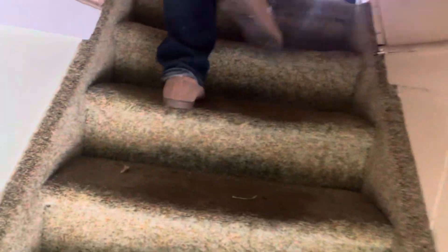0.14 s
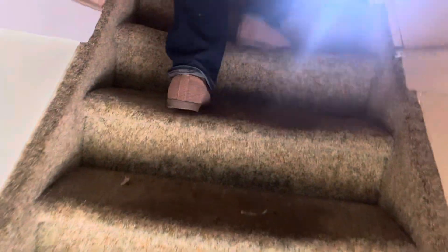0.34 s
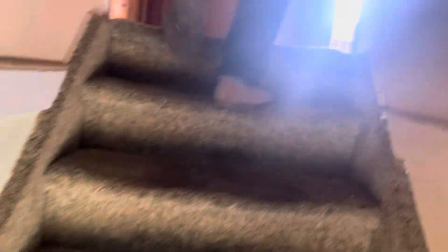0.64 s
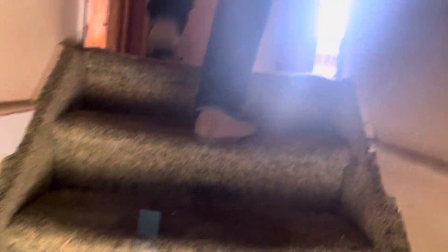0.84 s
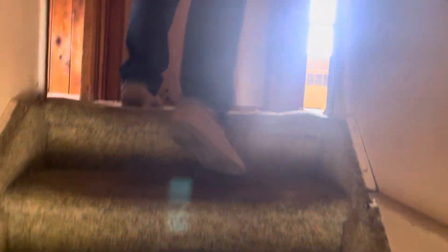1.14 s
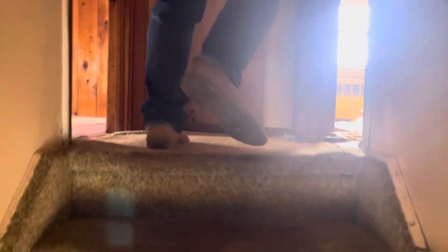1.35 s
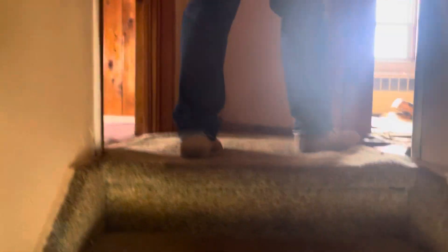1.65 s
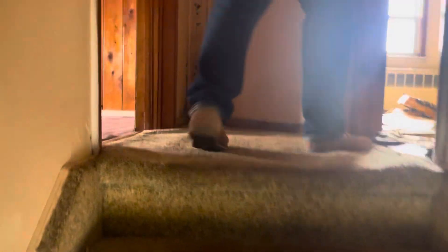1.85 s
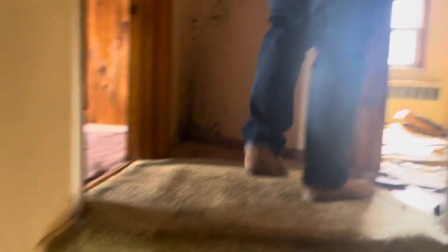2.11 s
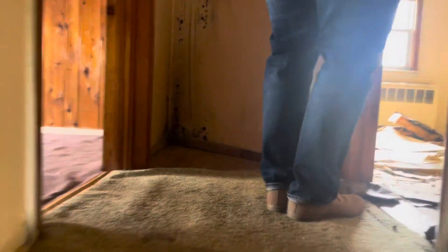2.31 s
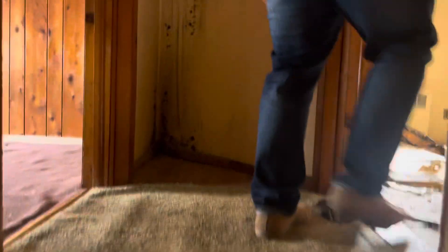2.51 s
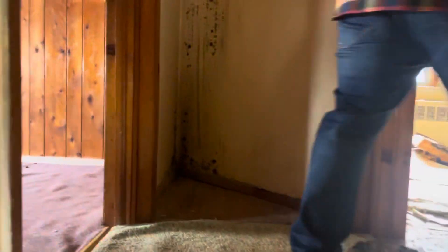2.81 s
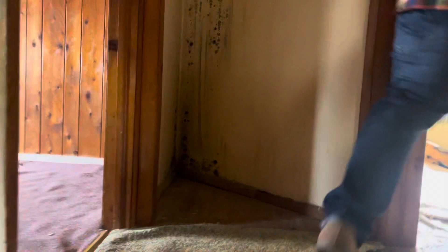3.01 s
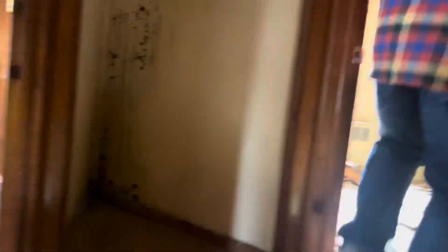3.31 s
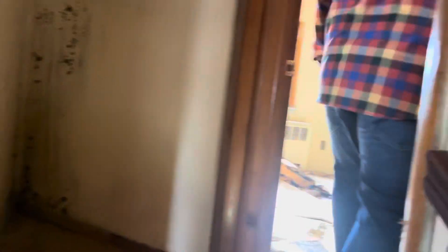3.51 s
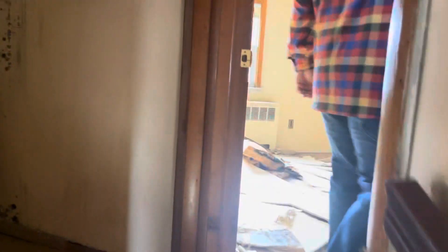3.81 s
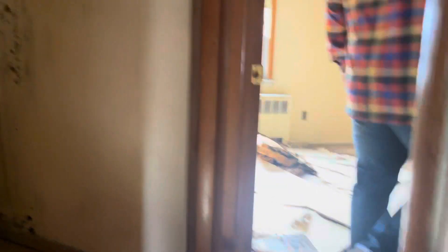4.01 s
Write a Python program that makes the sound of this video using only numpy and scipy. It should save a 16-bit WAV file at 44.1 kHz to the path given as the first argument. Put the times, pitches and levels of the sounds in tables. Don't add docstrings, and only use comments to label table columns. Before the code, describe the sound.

Close hand-held stereo capture in an empty stairwell: a soft first step, firmer regular thumps on carpet over wood, a heavy booming one near 2.4 seconds, then a softer step and a last firm one. Feet brush pile, trouser legs swish, fingers tap the casing, with a brief creaking crack around 1.9 seconds. Faint quiet-house air underneath, short indoor reverberation.

```python
import sys
import numpy as np
from scipy import signal
from scipy.fft import rfft, irfft, next_fast_len
from scipy.io import wavfile
from scipy.ndimage import uniform_filter1d, map_coordinates

SR = 44100
rng = np.random.default_rng(int(sys.argv[2]) if len(sys.argv) > 2 else 0)


def store_pcm(level_fs):
    pcm = np.round(np.clip(level_fs, -1, 1) * 32767).astype(np.int16)
    wavfile.write(sys.argv[1], SR, np.atleast_2d(pcm).T)


def gain_from_db(level_db):
    decades = np.asarray(level_db, float) / 20
    return 10 ** decades


N = 183191

# t/s, tread level/dB, riser level/dB, board level/dB, foot rolls down after/s
FOOTFALLS = [
    (0.223, -23, -26, -56, .003),
    (1.005, -14, -30, -25, .025),
    (1.704, -16, -27, -24, .017),
    (2.379, -8.5, -30, -13.5, .03),
    (2.96, -20, -28, -25, .01),
    (3.646, -15.5, -15, -31, .016),
]


def unit(x):
    return x / np.sqrt(np.mean(x ** 2) + 1e-20)


def along(points, hz):
    f, v = np.transpose(points)
    return np.interp(np.log(hz + 1), np.log(f + 1), v)


def wobble(rate):
    knots = rng.standard_normal(int(N * rate / SR) + 4)
    return map_coordinates(knots, [np.arange(N) * rate / SR])


def filtered(x, response):
    m = next_fast_len(x.shape[-1] + SR // 4)
    return irfft(rfft(x, m) * response(np.fft.rfftfreq(m, 1 / SR)), m)[..., :x.shape[-1]]


def rush(spectrum, n=N):
    # f/Hz, correlation [1]
    likeness = [(60, 0.91), (300, 0.96), (700, 0.38), (1500, 0.37), (3500, 0.55), (6500, 0.44),
                (8000, 0.81), (10200, 0.98), (12000, 0.61)]
    turn = lambda hz: np.arccos(np.clip(along(likeness, hz), -1, 1)) / 2
    shape = lambda hz: gain_from_db(along(spectrum, hz)) * [np.cos(turn(hz)), np.sin(turn(hz))]
    mid, side = filtered(rng.standard_normal((2, n)), shape)
    return unit(np.array([mid + side, mid - side]))


def ring(modes, t, scatter_db):
    return sum(gain_from_db(db + rng.normal(0, scatter_db) - 60 * t / t60) * np.sin(2 * np.pi * hz * t)
               for hz, db, t60 in modes)


def add(track, s, sound):
    part = track[..., max(round(s * SR), 0):][..., :sound.shape[-1]]
    part += sound[..., :part.shape[-1]]


def stir():
    # t/s, level/dB
    feet_moves = [(0.0, -61), (0.27, -71), (0.4, -52), (0.59, -64), (0.94, -65), (1.1, -58), (1.28, -64),
                  (1.84, -61), (2.0, -52), (2.33, -65), (2.43, -54), (2.57, -59), (2.71, -51), (2.93, -66),
                  (3.32, -60), (3.58, -69), (3.7, -56), (4.15, -68)]
    # t/s, level/dB
    leg_swings = [(0, -58), (.5, -58), (.63, -65), (.83, -54.5), (1.33, -68), (1.6, -57), (1.85, -64),
                  (2.0, -59), (2.1, -76), (2.21, -55), (2.47, -58), (2.57, -76), (2.82, -55), (3.3, -75),
                  (3.42, -56), (3.55, -63), (3.83, -53), (4.15, -61)]
    # f/Hz, level/dB
    floor_colour = [(12, -51), (20, -3.5), (65, 3), (134, -12), (254, -17), (356, -23), (395, -15.5),
                    (450, -21), (580, -28), (990, -120)]
    # f/Hz, level/dB
    pile_colour = [(240, -28), (400, -16), (702, -8), (1180, -16), (1230, -14.5), (1590, -18.5),
                   (3500, -29.5), (4550, -51), (7700, -120)]
    # f/Hz, level/dB
    cloth_colour = [(700, -25), (1200, -5), (2200, -6.5), (4100, -8), (7000, -8), (13000, -5.5)]
    # f/Hz, level/dB
    air_colour = [(60, -27), (100, -4.5), (280, -20), (500, -17.5), (1150, -27.5), (4500, -33),
                  (13000, -34.5)]
    time = np.arange(N) / SR
    feet_db = np.interp(time, *np.transpose(feet_moves))
    swing_db = np.interp(time, *np.transpose(leg_swings))
    floor_db = feet_db.mean() + 1.1 * (feet_db - feet_db.mean())
    shudder = gain_from_db(floor_db + 17.5 + 2.6 * wobble(14)) * rush(floor_colour)
    pile = gain_from_db(feet_db + 3.6 * wobble(40)) * rush(pile_colour)
    cloth = gain_from_db(swing_db + 1.9 * wobble(25.33)) * rush(cloth_colour)
    air = gain_from_db(-56.5) * rush(air_colour)
    return shudder + pile + cloth + air


def steps():
    # frequency ratio [1], level/dB
    cavity = [(.82, -0.5), (1.0, 9), (1.19, -6)]
    # f/Hz, level/dB, t60/s
    tread = [(171.7, -8, 0.09), (197, 1, 0.15), (220.5, -6.5, .2)]
    # f/Hz, level/dB, t60/s
    boards = [(292.3, -3.5, 0.12), (345.7, 3, 0.11), (413, -1, 0.093), (470.5, -8, 0.062)]
    # t/s, tread level/dB, riser level/dB, riser f/Hz
    light_contacts = [(0.038, -38, -49.5, 95), (0.36, -27, -56, 97), (0.419, -33, -37, 101),
                      (0.457, -30, -35, 117), (0.927, -36.5, -48, 98), (0.951, -34, -32, 95.5),
                      (1.181, -35, -62, 116), (1.376, -48, -37, 92), (1.562, -43, -62, 96),
                      (2.198, -45.5, -51, 94), (2.618, -34, -34, 121), (2.637, -31, -37, 155),
                      (2.888, -43, -53, 97), (3.234, -50, -44, 96), (3.324, -45, -43, 118),
                      (3.586, -43, -33, 145)]
    # t/s, level/dB, cavity f/Hz
    weight_shifts = [(0.044, -38.5, 66.6), (1.26, -41, 56), (0.384, -40, 66), (0.448, -43, 63.4),
                     (0.552, -38, 54.7), (.87, -41.5, 55), (0.944, -29, 69.3), (1.372, -35, 73.8),
                     (1.49, -43, 61), (2.049, -47, 56), (2.25, -41, 57), (2.433, -16, 60.8),
                     (2.632, -36, 68.4), (3.199, -43, 50.4), (3.308, -52, 60), (3.899, -37, 50.3),
                     (4.061, -45, 60.5)]
    # ball level/dB, its riser f/Hz, body weight level/dB, weight sinks in after/s
    follow_through = [
        (-20, 99, -19, .029),
        (-25, 95, -17, .024),
        (-24, 98, -14.5, .034),
        (-18, 112, -12, .02),
        (-12.5, 110, -15, .025),
        (-15, 118, -19, .034),
    ]
    heel_riser_hz, heel_ring, ball_ring, light_ring = 152, .85, .75, .95
    rebound_s, rebound_db = .1, -18
    cavity_hz, cavity_t60, shift_t60 = 60, .19, .25
    out, t = np.zeros(N), np.arange(SR // 2) / SR

    contacts = [(s, db, riser_db, hz, db - 13, light_ring) for s, db, riser_db, hz in light_contacts]
    loads = [(*row, shift_t60) for row in weight_shifts]
    for (s, heel, riser, board, roll), (ball, ball_hz, weight, sink) in zip(FOOTFALLS, follow_through):
        contacts.append((s, heel, riser, heel_riser_hz, board, heel_ring))
        contacts.append((s + roll, ball - 9, ball, ball_hz, ball - 13, ball_ring))
        loads.append((s + sink, weight, cavity_hz, cavity_t60))
        loads.append((s + sink + rebound_s, weight + rebound_db, cavity_hz, shift_t60))

    for s, tread_db, riser_db, riser_hz, board_db, length in contacts:
        longer = lambda modes: [(hz, db, t60 * np.clip(length, .2, 2)) for hz, db, t60 in modes]
        riser_modes = [(riser_hz, 0, .23), (riser_hz * 0.74, -7, .3)]
        thud = gain_from_db(tread_db - 0.5) * ring(longer(tread), t, scatter_db=2.5)
        thud -= gain_from_db(riser_db + 3.5) * ring(longer(riser_modes), t, scatter_db=1.4)
        thud -= gain_from_db(board_db - 1.0) * ring(longer(boards), t, scatter_db=2.4)
        add(out, s - .004, thud * (1 - np.exp(-t / 0.0019)))

    for s, db, boom_hz, t60 in loads:
        boom = ring([(boom_hz * ratio, level, t60) for ratio, level in cavity], t, scatter_db=1.5)
        add(out, s - .012, gain_from_db(db) * boom * (1 - np.exp(-t / 0.0041)) ** 2)
    return filtered(out, lambda hz: 1 / (1 + 1j * hz / 520) ** 2)


def stairwell(x):
    # f/Hz, t60/s
    decay = [(50, 0.48), (200, 0.39), (800, 0.31), (8000, 0.16)]
    hz, t, z = signal.stft(rng.standard_normal((3, SR)), SR, nperseg=1024)
    tail = signal.istft(z * gain_from_db(-60 * t / along(decay, hz)[:, None]), SR, nperseg=1024)[1]
    pair = np.array([tail[0] + 0.075 * tail[1], tail[0] - 0.2 * tail[1]])
    late = np.pad(x, (400, 0))[None]
    return signal.fftconvolve(late, pair / np.linalg.norm(tail[0]), axes=1)[:, :N]


def taps():
    # t/s, level/dB, f/Hz, low body level/dB
    tap_events = [(0.042, -50.5, 590, -48.5), (0.358, -43, 845, -41), (0.489, -31.5, 570, -36),
                  (0.529, -38, 640, -31), (0.713, -45, 565, -56), (1.466, -44.5, 547, -57),
                  (1.519, -45, 514, -58), (1.565, -38.5, 636, -45), (1.908, -38, 600, -42),
                  (1.922, -34, 656, -37), (1.931, -28, 603, -27.5), (1.96, -29, 550, -28.5),
                  (1.997, -32.5, 675, -27), (2.092, -34, 600, -58), (2.2, -41.5, 794, -45),
                  (2.617, -47, 565, -54), (2.633, -38.5, 594, -36.5), (2.688, -38, 520, -52),
                  (2.701, -38, 590, -40), (2.712, -37, 567, -39), (2.726, -40, 477, -39),
                  (3.676, -39, 520, -35)]
    pan_db = 2.1
    out, t = np.zeros((2, N)), np.arange(SR // 10) / SR
    for s, db, tap_hz, body_db in tap_events:
        tap = gain_from_db(db + 13.5) * ring([(tap_hz, 0, .024), (tap_hz * 1.17, -9, .03)], t, scatter_db=1.2)
        tap += gain_from_db(body_db + 8.5) * ring([(402, 2.5, 0.03), (282, -2.5, 0.037)], t, scatter_db=0.1)
        tap *= (1 - np.exp(-t / .0016)) ** 2
        add(out, s - .0015, gain_from_db([[pan_db / 2], [-pan_db / 2]]) * tap)
    out[0] = np.roll(out[0], 9)
    return filtered(out, lambda hz: 1 / (1 + (hz / 950) ** 6))


def scuffs():
    # t/s, level/dB, drag/s, centre f/Hz, tick level/dB
    sole_scuffs = [(.354, -43, 0.015, 1290, -39), (0.41, -44, 0.01, 1500, -22),
                   (.71, -44.5, 0.035, 800, -60), (.93, -48, 0.035, 695, -60),
                   (1.031, -42, 0.014, 1000, -35), (1.065, -69, .01, 1960, -40),
                   (1.335, -58, 0.067, 2500, -47), (1.98, -47, 0.06, 1180, -70),
                   (2.198, -44, 0.03, 1000, -38), (3.043, -49, 0.085, 2330, -62),
                   (3.69, -46, 0.04, 1000, -60), (3.759, -44, 0.0086, 5500, -35),
                   (3.838, -50, .008, 4500, -44), (3.925, -51, 0.05, 3630, -55)]
    # t/s, level/dB, drag/s, tick level/dB
    brushes = [
        (2.618, -51.5, .054, -50),
        (2.692, -50.5, .022, -54),
        (3.05, -61, .09, -60),
        (3.76, -55, .08, -41),
        (3.936, -53, .012, -41.5),
    ]
    heel_grows = .45
    out, t = np.zeros((2, N)), np.arange(SR // 4) / SR
    strokes = [(*row, .9) for row in sole_scuffs]
    strokes += [(s, db, drag, 5200, tick_db, 4.5) for s, db, drag, tick_db in brushes]
    strokes += [(s, heel_grows * db - 41, .06, 780, heel_grows * db - 53, 1.1) for s, db, *_ in FOOTFALLS]
    for s, db, drag, centre_hz, tick_db, octaves in strokes:
        clumps = gain_from_db(2.6 * unit(uniform_filter1d(rng.standard_normal(len(t)), size=100)))
        fade = np.exp(-(t / np.clip(drag, .003, .2)) ** 1.6)
        swell = gain_from_db(db) * (1 - np.exp(-t / 0.0014)) * fade * clumps
        tick = gain_from_db(tick_db) * np.exp(-t / 0.00075)
        burst = rush([(20, 0.0068), (20000, 0.0047)], len(t)) * (swell + tick)
        band = lambda hz: gain_from_db(6 - 5.25 * (np.log2((hz + 1) / centre_hz) / octaves) ** 2)
        add(out, s, filtered(burst, band))
    return out


def creaks():
    # t/s, level/dB
    slip_events = [
        (1.9127, -21.5),
        (1.9281, -22),
        (1.937, -12),
        (1.9507, -30),
    ]
    # f/Hz, width/Hz, level/dB
    near_shell = [(2250, 1100, -8), (4700, 1800, -2), (6350, 900, 1.5), (9400, 1000, -9),
                  (11000, 1500, -20)]
    # f/Hz, width/Hz, level/dB
    far_shell = [(4140, 1200, -11), (6500, 2000, -21), (9400, 1200, -15), (10700, 1700, -21)]
    slips, t = np.zeros(N), np.arange(SR // 100) / SR
    for s, db in slip_events:
        click = 4.2 * (t == 0)
        grind = .45 * rng.standard_normal(len(t)) * t / 0.00036 * np.exp(1 - t / 0.00035)
        add(slips, s + .0008, gain_from_db(db + 7.5) * (click + grind))
    shell = lambda modes: lambda f: sum(gain_from_db(db) * 1j * f * w / (c * c - f * f + 1j * f * w) for c, w, db in modes)
    duller = lambda hz: .22 + .78 / (1 + (hz / 6900) ** 12)
    left = filtered(slips, lambda hz: shell(near_shell)(hz) * duller(hz))
    right = filtered(np.roll(slips, -20), shell(far_shell))
    return np.array([left, right])


def scene():
    feet, knocks, soles = steps(), taps(), scuffs()
    echo = gain_from_db(-11) * stairwell(feet) + gain_from_db(-11) * stairwell(soles.mean(axis=0))
    faint_echo = gain_from_db(-21) * stairwell(knocks.mean(axis=0))
    return feet + knocks + soles + echo + faint_echo + creaks() + stir()


def ports(dry):
    # f/Hz, level/dB
    port_tone = [(7000, 0.5), (8500, 3.5), (10200, 6.5), (11200, 2), (11900, -11), (12800, -19),
                 (14000, -46)]
    # f/Hz, phase [rad]
    right_ahead = [(60, .3), (500, .4), (900, -.4), (1500, .3), (3700, -.6), (5200, -.6), (6600, -.2),
                   (7700, -.75), (8600, .1), (9300, 1.55), (9850, 2.75), (10300, 3.14), (10900, 3.9),
                   (11500, 6.2)]
    # f/Hz, level/dB
    left_over = [(60, -0.7), (200, 1.5), (350, -1), (900, -2), (2500, .5), (5000, 2), (8500, 0.5)]
    delay = lambda hz: np.exp(-2j * np.pi * 0.64 * np.log((hz + 12) / 22050))
    bass_cut = lambda hz: (hz / (hz - 40j)) ** 2
    balance = lambda hz: gain_from_db(np.outer([.5, -.5], along(left_over, hz)))
    phase = lambda hz: np.exp(np.outer([-.5j, .5j], along(right_ahead, hz)))
    tone = lambda hz: gain_from_db(along(port_tone, hz))
    return filtered(dry, lambda hz: delay(hz) * bass_cut(hz) * balance(hz) * phase(hz) * tone(hz))


def hush_faint_bands(pair):
    # f/Hz, level over the usual 5 kHz level/dB
    threshold = [(2500, -40), (4000, -15), (6000, -11.5), (7500, -11.5), (8600, -8), (10300, -3),
                 (11500, -3.7), (12200, -5)]
    hz, _, z = signal.stft([pair[0] + pair[1], pair[0] - pair[1]], SR, nperseg=2048)
    power = np.mean(abs(z[:, :-1].reshape(2, 64, 16, -1)) ** 2, axis=2)
    centre = hz[8::16, None]
    usual = np.median(power[0, 14])
    is_open = power > usual * gain_from_db(2 * along(threshold, centre))
    z[:, :-1] *= np.repeat(is_open, 16, axis=1)
    mid, side = signal.istft(z, SR, nperseg=2048)[1][:, :N] / 2
    return np.array([mid + side, mid - side])


def roll_off(x):
    return signal.sosfilt(signal.butter(12, 13080, fs=SR, output="sos"), x)


def record(dry):
    mix = hush_faint_bands(ports(dry))
    return roll_off(mix)


dry = scene()
out = record(dry)
store_pcm(out)
```